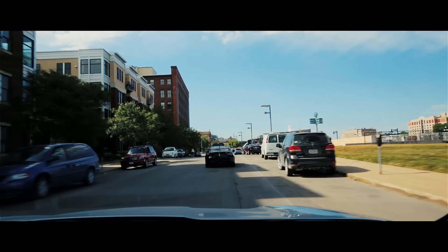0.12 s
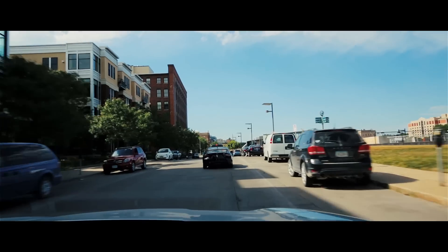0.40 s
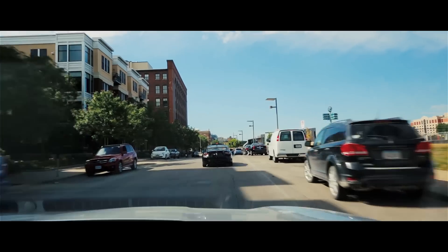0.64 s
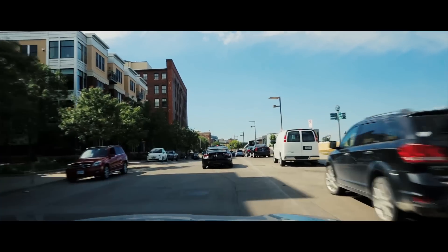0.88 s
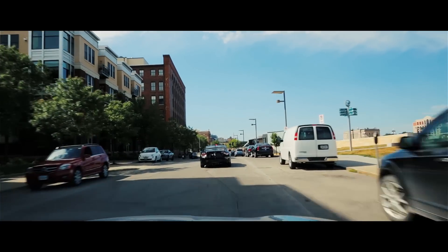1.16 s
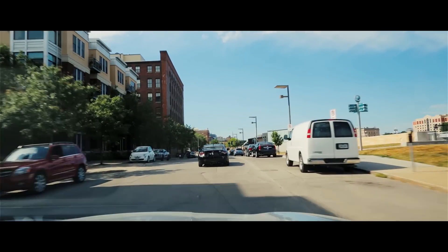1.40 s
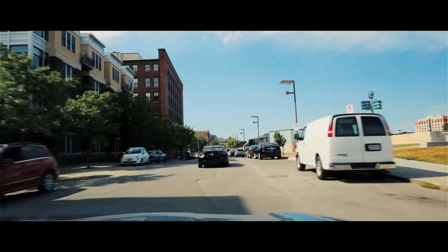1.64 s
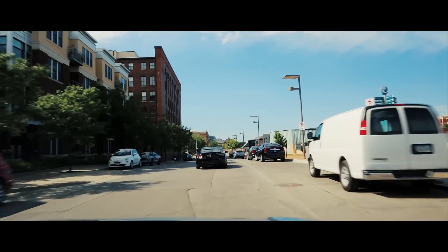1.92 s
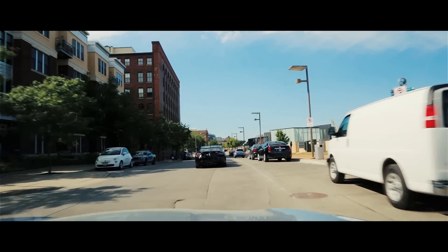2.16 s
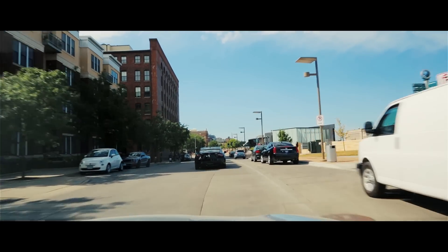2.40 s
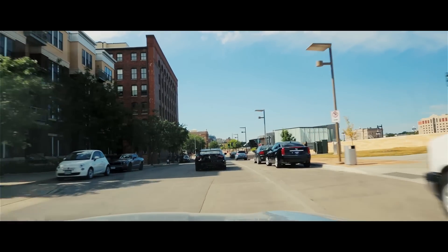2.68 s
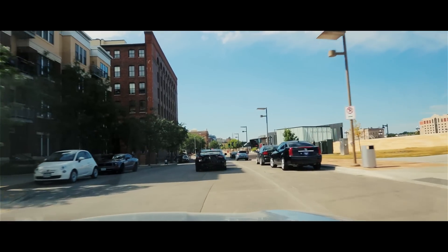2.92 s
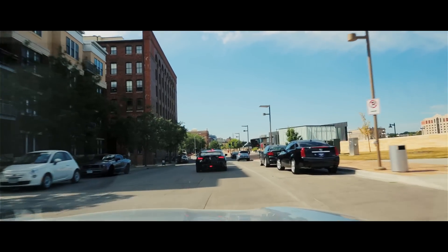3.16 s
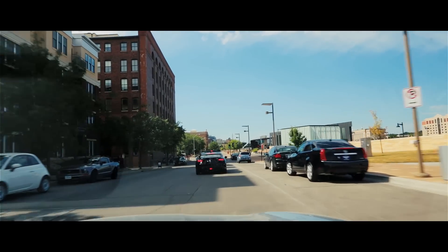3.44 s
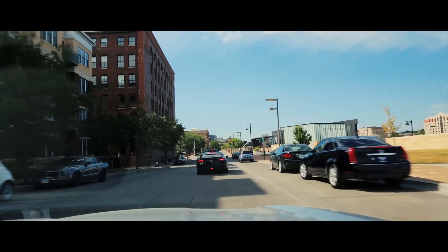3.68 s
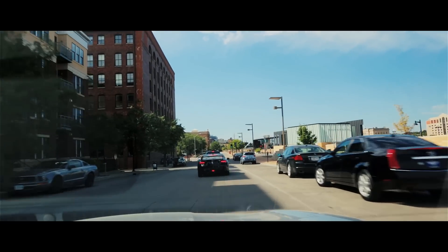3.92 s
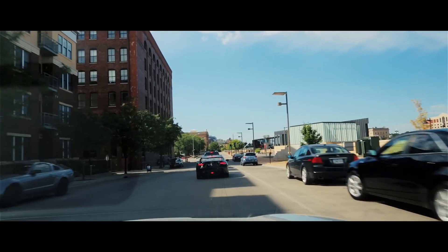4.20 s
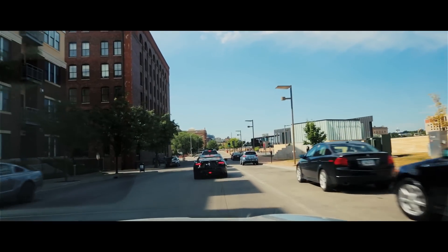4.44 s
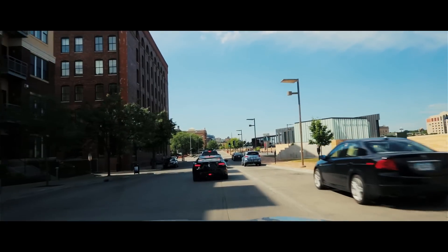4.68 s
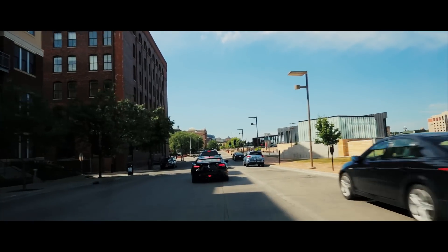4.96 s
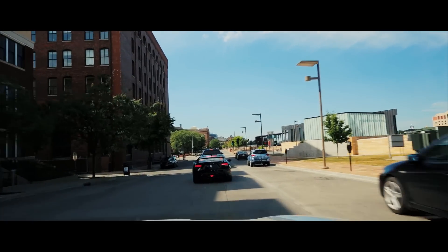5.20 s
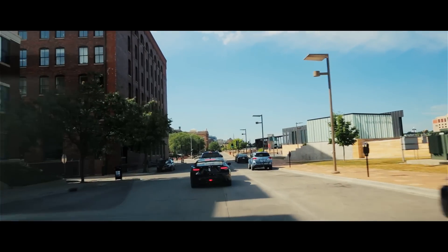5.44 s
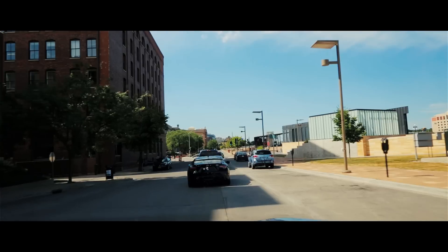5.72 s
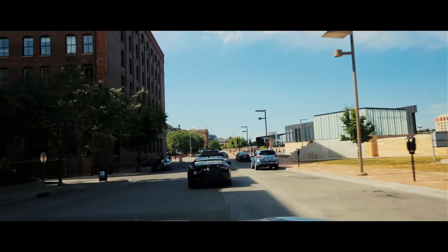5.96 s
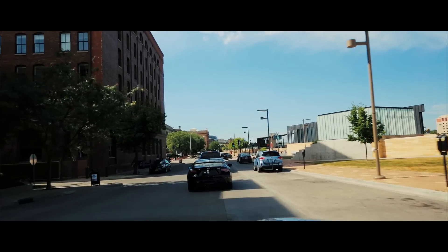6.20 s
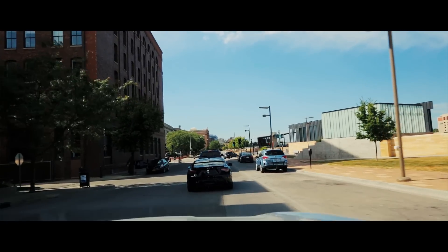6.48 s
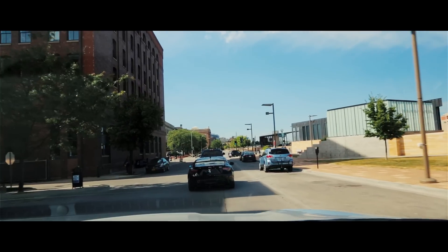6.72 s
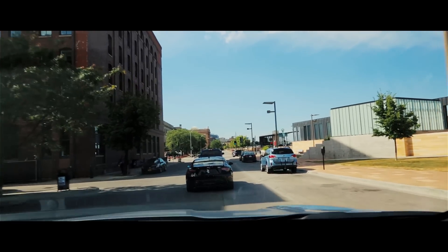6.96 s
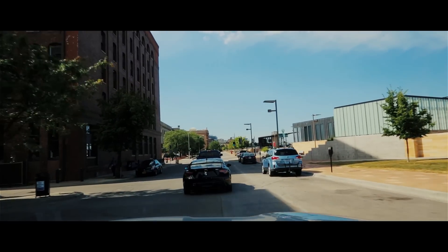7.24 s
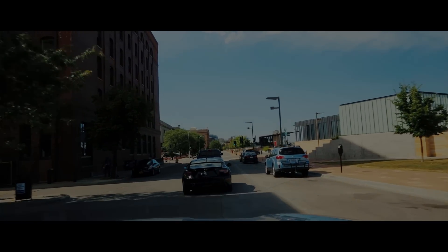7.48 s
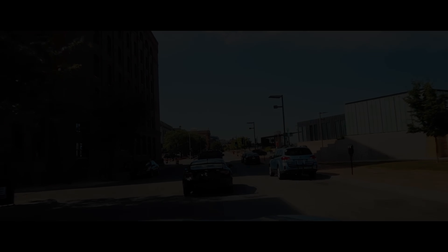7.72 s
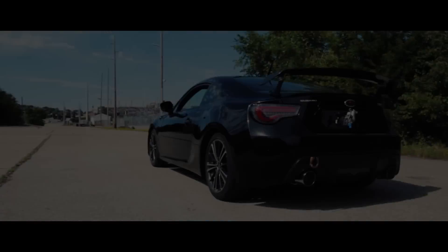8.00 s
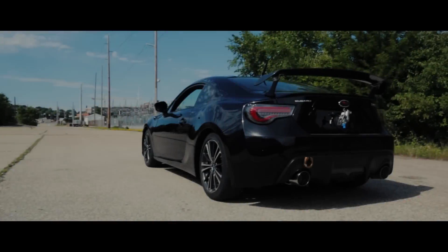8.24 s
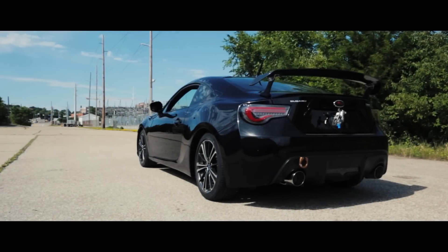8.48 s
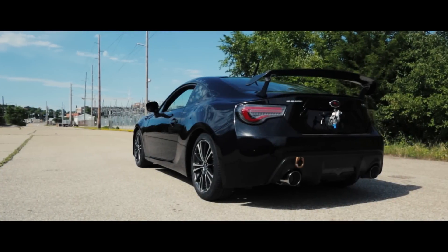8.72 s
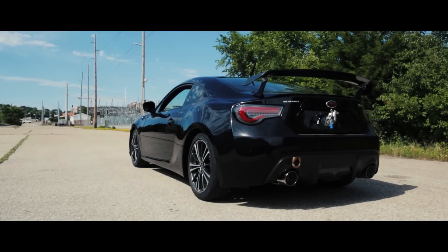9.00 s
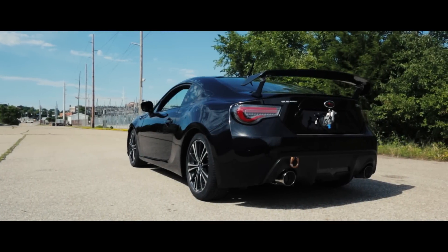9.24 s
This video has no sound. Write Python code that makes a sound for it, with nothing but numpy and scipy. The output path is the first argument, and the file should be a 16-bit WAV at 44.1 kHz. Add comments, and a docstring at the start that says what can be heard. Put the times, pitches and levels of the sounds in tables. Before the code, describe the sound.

Boomy, lumpy engine with a loud exhaust, heard in the cabin on a city street over bassy road noise. It climbs, pops on lift-off, swells again, then drones downward until barely idling; faint whine and ticks emerge. Then the microphone is outside near the standing car in an open lot: one small blip, a stronger barking rev, brief airy whistles as the throttle shuts, revs falling in a hollow hum.

```python
"""A four-cylinder sports car with a loud exhaust. First it is muffled and on the move over road noise: it
pulls, lifts off with pops in the pipe, blips, and coasts down to idle with a faint whine and two dry ticks.
A cross-fade then brings it standing in the open, revved twice, with whistles as the throttle shuts.
Unequal header pipes make the four firings arrive unevenly: summed sines give the boom on the low orders,
pulses ring the pipe resonances for the bark, and shaped pulses and noise give rasp and hiss above."""
import sys
import numpy as np
from scipy import signal
from scipy.fft import rfft, irfft, next_fast_len
from scipy.io import wavfile
from scipy.ndimage import uniform_filter1d

SR = 44100
rng = np.random.default_rng(int(sys.argv[2]) if len(sys.argv) > 2 else 0)


def materialize(psi):
    """Save the field psi as 16-bit PCM at rate SR to the path in sys.argv[1].

    A 1-D psi becomes a single channel; in a 2-D psi each row is a channel.
    """
    bounded = np.clip(np.atleast_2d(psi).T, -1, 1)
    quanta = np.round(bounded * 32767).astype(np.int16)
    wavfile.write(sys.argv[1], SR, quanta)


def boost(x):
    """Linear amplitude factor 10**(x/20) for a level x in decibels (scalar or array-like)."""
    u = np.asarray(x, float) / 20
    return 10 ** u


N = 413216


def rms_one(x):
    """The signal brought to rms 1 over its whole length."""
    return x / np.sqrt(np.mean(x ** 2) + 1e-20)


def columns(rows, t):
    """Every column after the first, interpolated at times t."""
    s, *rest = np.transpose(rows)
    return [np.interp(t, s, c) for c in rest]


def at_hz(points, hz):
    """Level of a spectrum's corner points, joined by lines over log frequency."""
    corner_hz, db = np.array(points).T
    return np.interp(np.log(hz), np.log(corner_hz), db)


def evened(x):
    """Running rms brought to 1 over 6000 samples (136 ms)."""
    return x / np.sqrt(uniform_filter1d(x ** 2, size=6000) + 1e-12)


def coloured(spectrum, x, smooth_hz=0):
    """The input shaped by a spectrum, corners rounded over smooth_hz; minimum phase, so nothing sounds early."""
    size = next_fast_len(len(x))
    hz = np.arange(1, size // 2 + 2) * SR / size
    shape_db = uniform_filter1d(at_hz(spectrum, hz), size=1 + int(smooth_hz * size / SR))
    # folding the cepstrum onto positive time makes the phase minimum
    cepstrum = irfft(shape_db * np.log(10) / 20, size)
    cepstrum[1:size // 2] *= 2
    cepstrum[size // 2 + 1:] = 0
    return irfft(rfft(x, size) * np.exp(rfft(cepstrum)), size)[:len(x)]


def resonance(x, hz, width_hz):
    """Two-pole band-pass, gain 1 on top."""
    r = np.exp(-np.pi * width_hz / SR)
    numerator = np.array([1, 0, -1]) * (1 - r * r) / 2
    return signal.lfilter(numerator, [1, -2 * r * np.cos(2 * np.pi * hz / SR), r * r], x)


# the burn stumbles and the half order swells: start t/s, length/s, level/dB
STUMBLE_SWELLS = [(0.484, 0.21, -26), (0.873, .1, -47.5), (1.064, 0.036, -18), (2.501, 0.36, -29),
                  (7.52, .08, -46), (8.4, 0.13, -43)]


def half_order(t, first_db):
    """Level of the half order in dB: faint under the firing tone, swelling in each stumble."""
    edge_s, under_firing_tone_db = 0.024, -39
    swell = 0
    for s, length, db in STUMBLE_SWELLS:
        inside = np.minimum(t - s, s + length - t)
        swell = swell + boost(db) * np.clip(inside / edge_s + 1, 0, 1)
    return 20 * np.log10(boost(first_db + under_firing_tone_db) + swell)


# the four cylinders in firing order, before unevenness and imbalance scale them: lag/ms, strength/dB
CYLINDER_PATTERN = [(.54, 1.8), (-.54, -.2), (-.18, -1.4), (.18, 0)]
# as the revs sink from the first rate to the second the pattern shifts: firing rates/(1/s)
PATTERN_SHIFT_RATES = (140, 105)
# full shift of each cylinder, before imbalance scales it: level/dB
PATTERN_SHIFT = [-.8, 2, -.2, -.6]


def strengths(rate, imbalance, shifts, bias_db):
    """Strength of each cylinder over time in dB; a negative imbalance reverses the pattern."""
    high_rate, low_rate = PATTERN_SHIFT_RATES
    sunk = shifts * np.clip((high_rate - rate) / (high_rate - low_rate), 0, 1)
    own_db = np.array(CYLINDER_PATTERN)[:, 1:] + np.reshape(bias_db, (-1, 1))
    return (own_db + np.array(PATTERN_SHIFT)[:, None] * sunk) * imbalance


def waver(shape, rate):
    """Slow complex noise from two equal low-pass poles, one row per order; overall rms 1."""
    blur_hz = 20
    r = np.exp(-2 * np.pi * blur_hz / rate)
    noise = rng.standard_normal(shape) + 1j * rng.standard_normal(shape)
    slow = signal.lfilter([1], [1, -2 * r, r * r], noise)
    return slow / np.sqrt(np.mean(abs(slow) ** 2))


def boom_lead(rate):
    """Firing intervals by which the firing tone leads the pulses, most near the pipe's deepest resonance."""
    return .02 + .13 * np.exp(-((rate - 100) / 32) ** 2)


# orders of the firing rate whose levels are set one by one: order
SET_ORDERS = [1, 1 / 2, 3 / 4, 2, 4, 5 / 4, 3 / 2, 7 / 4, 5 / 2, 3, 9 / 4]
# relative response of the exhaust's low end: f/Hz, level/dB
PIPE_RESPONSE = [(20, -49.5), (50, -13.5), (95, 16), (120, 2), (150, -8.5), (190, 5), (235, -14),
                 (290, -10), (340, -16), (400, -25.5), (750, -47.5)]


def boom(turns, rate, uneven, strength_db, heard_db, others_db, blur, polarity):
    """Sines on every quarter order up to the eleventh; the cylinder pattern sets their phase and balance."""
    step = slice(0, None, 64)   # the orders' levels and phases move slowly
    tilt_db = -2.5   # per doubling of the order: a pulse is broad
    lag_s, strength = np.array(CYLINDER_PATTERN)[:, :1] / 1000, boost(strength_db[:, step])
    order = np.arange(1, 45)[:, None] / 4
    order_hz = order * rate[step]
    # the slow body of each pulse lags more than its steep front
    arrival = np.arange(4)[:, None] + 2.2 * lag_s * uneven[step] * rate[step]
    wave = sum(a * np.exp(-2j * np.pi * order * d) for a, d in zip(strength, arrival))
    wave = wave * boost(at_hz(PIPE_RESPONSE, order_hz) + tilt_db * np.log2(order))
    upper = np.exp(-((order_hz - 285) / 80) ** 2)   # the part of the stack that sets the others' level
    wave *= boost(others_db[step]) / np.sqrt(np.sum(upper * abs(wave) ** 2, axis=0))
    for k, db in zip(SET_ORDERS, heard_db):
        row = round(4 * k) - 1
        wave[row] *= boost(db[step]) / (abs(wave[row]) + 1e-12)
    wave[[1, 5]] *= -1   # the half and 3/2 orders leave the pipe inverted
    wave[7] *= polarity   # second order
    # orders from 9/4 up waver
    wavering = 1 + blur[step] * waver(wave[8:].shape, SR / 64)
    wave[8:] *= wavering / np.sqrt(1 + blur[step] ** 2)
    wave[3] *= np.exp(2j * np.pi * boom_lead(rate[step]))   # the firing tone
    fine, coarse = np.arange(len(turns)), np.arange(len(turns))[step]
    # each power of the engine cycle is the next quarter order
    cycle, power, out = np.exp(2j * np.pi * turns / 4), 1, 0
    for w in wave:
        power = power * cycle
        out = out + (np.interp(fine, coarse, w) * power).real
    return np.sqrt(2) * out


# single firings that come harder or weaker than their turn: t/s, level/dB
UNUSUAL_FIRINGS = [(.163, 1.5), (.244, 2.5), (.638, 5), (.78, 1.5), (.923, 2.5), (1.012, 2.5), (1.648, 2),
                   (1.657, 4), (1.696, 3), (1.735, 2), (1.765, 2), (1.774, 2.5), (1.804, 2), (1.813, 0.5),
                   (1.92, 2), (1.959, 1), (2.422, 4), (2.765, 4), (7.938, -1.5), (7.962, 8), (7.975, -5),
                   (7.987, 8.5), (8, -4), (8.012, 1.5), (8.025, -17), (8.047, -2.5), (8.09, -2.5),
                   (8.129, 1), (8.139, 3), (8.165, 2.5), (8.175, 3), (8.2, 2), (8.225, 3), (8.263, 2),
                   (8.293, -.5), (8.321, 0)]


def firings(t, turns, uneven, strength_db, scatter_db, steepen, lead_ms):
    """One pulse per firing, uneven in time and strength; returns due samples, scatter/dB, blows and fronts."""
    number = np.arange(np.ceil(turns[0]), turns[-1])
    due = np.interp(number, turns, np.arange(len(t))).astype(int)
    cylinder = number.astype(int) % 4
    lag_ms = np.array(CYLINDER_PATTERN)[cylinder, 0]
    luck = rng.standard_normal((len(number), 2)) * scatter_db[due, None]
    firing_db = strength_db[cylinder, due] + luck[:, 0]
    for s, db in UNUSUAL_FIRINGS:
        if t[0] < s < t[-1]:
            firing_db[np.argmin(abs(t[due] - lead_ms / 1000 - s))] += db
    # an unsteady burn also comes a little early or late
    at = due + (lag_ms * uneven[due] - lead_ms + 0.025 * luck[:, 1]) * SR / 1000
    at = np.clip(np.round(at).astype(int), 0, len(t) - 1)
    blows, fronts = np.zeros(len(t)), np.zeros(len(t))
    blows[at] = boost(firing_db)
    fronts[at] = boost(steepen * firing_db)   # strong pulses steepen and carry more treble
    return due, luck[:, 0], blows, fronts


def bark(blows, rate, share, stir_db, bark_modes, loaded_modes, shut_modes, low_hz, top_hz):
    """Pipe resonances rung by the pulses and, with the throttle shut, stirred by flow noise as well."""
    # at low revs flow noise takes over from the pulses: 14 dB per octave under 90 firings per s
    octaves_sunk = np.clip(np.log2(90 / rate), 0, 1)
    flow = boost(stir_db + 14 * octaves_sunk) * (1 - share) ** 2 * rng.standard_normal(len(rate))
    stirred = evened(blows) + flow
    main = sum(boost(db) * resonance(stirred, hz, width) for hz, width, db in bark_modes)
    main = signal.sosfiltfilt(signal.butter(2, low_hz, "high", fs=SR, output="sos"), main)
    main = signal.sosfiltfilt(signal.butter(6, top_hz, fs=SR, output="sos"), main)

    def narrow(modes):
        """Each mode is two equal resonances in a row, held at a steady level."""
        return sum(boost(db) * evened(resonance(resonance(stirred, hz, width), hz, width))
                   for hz, width, db in modes)

    return evened(main) + share * narrow(loaded_modes) + (1 - share) * narrow(shut_modes)


def rasp(fronts, colour, puff_ms, crack_db, smooth_hz):
    """The crack of each steep front and the decaying turbulent puff behind it."""
    puff_envelope = signal.lfilter([1], [1, -np.exp(-1000 / (puff_ms * SR))], fronts)
    puffs = puff_envelope * rng.standard_normal(len(fronts))
    source = boost(crack_db) * rms_one(fronts) + rms_one(puffs)
    return evened(coloured(colour, source, smooth_hz=smooth_hz))


def hiss(length, colour):
    """Steady coloured noise: the part of the treble that does not follow the firings."""
    return rms_one(coloured(colour, rng.standard_normal(length)))


def engine(speed, levels, sides, burn, stir, bark_modes, loaded_modes, shut_modes, hiss_colour, rasp_colour,
           start_turn, steepen, puff_ms, crack_db, stack_db, shifts, lead_ms, polarity, low_hz, top_hz,
           smooth_hz, bias_db):
    """One firing after another: boom, bark and rasp share the same timing and scatter."""
    first, last = max(int(speed[0][0] * SR), 0), min(int(burn[-1][0] * SR), N)
    t = np.arange(first, last) / SR
    rate, = columns(speed, t)
    first_db, second_db, lope_db, bark_db, treble_db = columns(levels, t)
    # the fourth order lies 7 dB under the second, before the pipe
    pipe_gap_db = at_hz(PIPE_RESPONSE, rate * 4) - at_hz(PIPE_RESPONSE, 2 * rate)
    fourth_db = second_db - 7 + pipe_gap_db
    side_db = columns(sides, t)
    nine_quarter_db = side_db[0] - 10   # under the 5/4 order
    heard_db = [first_db, half_order(t, first_db), lope_db, second_db, fourth_db, *side_db, nine_quarter_db]
    others_db = stack_db + 0.67 * bark_db   # the rest of the stack follows a share of the bark's swing
    uneven, imbalance, scatter_db, rasp_share = columns(burn, t)
    share = np.clip(rasp_share, 0, 1)
    stir_db, blur = columns(stir, t)

    turns = start_turn + np.cumsum(rate) / SR - boom_lead(rate)   # counted in firings
    strength_db = strengths(rate, imbalance, shifts, bias_db)
    due, luck_db, blows, fronts = firings(t, turns, uneven, strength_db, scatter_db, steepen, lead_ms)
    low = boom(turns, rate, uneven, strength_db, heard_db, others_db, blur * (1 - share), polarity)
    low = low * boost(0.5 * np.interp(np.arange(len(t)), due, luck_db))   # half the scatter reaches the boom
    middle = bark(blows, rate, share, stir_db, bark_modes, loaded_modes, shut_modes, low_hz, top_hz)
    crackle = np.sqrt(share) * rasp(fronts, rasp_colour, puff_ms, crack_db, smooth_hz)
    treble = crackle + np.sqrt(1 - share) * hiss(len(t), hiss_colour)
    out = np.zeros(N)
    out[first:last] = low + polarity * boost(bark_db) * middle + boost(treble_db) * treble
    return out


# engine speed on the move: t/s, firing rate/(1/s)
MOVING_SPEED = [(0, 141.51), (.42, 156.77), (.5, 158.19), (1.11, 127.09), (1.38, 101.82), (1.5, 98.12),
                (1.8, 102.67), (2.43, 109.21), (2.68, 105.43), (2.83, 106.24), (3.96, 97.95), (4.64, 89.09),
                (4.8, 85.23), (5.78, 44.58), (6.12, 29.33), (6.28, 26.96), (6.86, 31.79), (7.36, 31.19)]
# layers: t/s, then level/dB of firing tone, second order, 3/4 order lope, bark, treble
MOVING_LEVELS = [(0, -15.5, -23.5, -25, -16, -25.5), (.38, -16, -25, -24, -17, -28),
                 (0.452, -19, -29.5, -30, -19, -34.5), (.5, -25, -34.5, -19, -32, -50),
                 (.65, -17, -34.5, -33.5, -33.5, -50.5), (.85, -14.5, -30, -20.5, -29, -51.5),
                 (1.1, -18.5, -30.5, -21.5, -35, -54), (1.299, -19, -44.5, -41, -42.5, -55.5),
                 (1.501, -17, -23.5, -55, -33.5, -55.5), (1.62, -12.5, -19.5, -49.5, -26, -49),
                 (1.78, -12, -18, -52, -22, -41), (2.201, -14.5, -24, -37, -24.5, -48),
                 (2.45, -24, -44, -48, -36.5, -54.5), (2.6, -14.5, -35, -29, -44, -55),
                 (2.9, -11.5, -35.5, -32, -39.5, -53.5), (4.502, -10, -29, -41.5, -43, -54),
                 (4.999, -17.5, -31.5, -49, -50, -59.5), (5.6, -24, -22.5, -56.5, -55, -61.5),
                 (5.95, -40, -26, -69.5, -65, -65.5), (6.121, -67, -28, -70, -67, -69),
                 (6.22, -66.5, -50, -73.5, -99.5, -71), (6.7, -53, -36, -82, -68, -76.5),
                 (7.36, -49, -38, -84, -68, -72)]
# neighbours of the firing tone: t/s, then level/dB of the 5/4, 3/2, 7/4, 5/2 and third orders
MOVING_SIDES = [(0, -28, -36, -32.5, -42, -56), (.4, -28, -30.5, -33.5, -39.5, -41),
                (.55, -32.5, -35.5, -40.5, -53, -54), (.66, -20.5, -35.5, -38.5, -55.5, -62),
                (.83, -30, -25, -37, -40.5, -45), (1.05, -26.5, -31, -50.5, -44, -48.5),
                (1.27, -48.5, -40, -30, -42.5, -41), (1.48, -29.5, -35, -23, -41, -33),
                (1.75, -31, -31.5, -26, -28.5, -27.5), (2.15, -36.5, -32.5, -19.5, -39.5, -27.5),
                (2.45, -40, -40, -26, -50.5, -41.5), (3.1, -34, -33.5, -27, -39.5, -48.5),
                (3.95, -32, -38.5, -27.5, -41, -65), (4.6, -31, -36, -29, -35.5, -47),
                (5.3, -39.5, -41, -31.5, -30.5, -37), (5.9, -53, -48.5, -45, -50, -29.5),
                (6.25, -59, -53, -53.5, -53, -43.5), (6.8, -63.5, -47, -56, -54.5, -29),
                (7.36, -65, -56, -56.5, -57, -32.5)]
# combustion: t/s, unevenness of arrival [0-1], factor on the cylinders' strength gaps (negative reverses),
# firing-to-firing scatter level/dB, rasp share of the treble [0-1]
MOVING_BURN = [(0, 0.32, 1.3, 0.44, 0.98), (0.449, 0.31, 1.5, 0.49, 0.98), (0.519, 1, -3.5, 2, 0.12),
               (.8, 0.23, -12, 1.9, 0.16), (1.1, 0.88, -23, 6.4, 0.1), (1.22, 0.7, 4.5, 0.49, 0.037),
               (1.499, 1, 1.5, 1, 0.032), (1.62, .86, 0.3, 0.84, .3), (1.72, .9, 3, 0.47, 0.86),
               (1.86, .9, 1.76, .5, 0.83), (2.05, .9, 1.5, .5, 0.74), (2.302, 0.89, 2, 0.083, 0.51),
               (2.548, 0.82, -6.5, 3.2, 0.075), (2.949, 0.93, -12, 0.46, 0.024),
               (4.802, 0.94, 0.5, 0.1, 0.0093), (5.501, 0.98, 1.5, 0.99, 0.027),
               (6.099, 0.83, -7, 3, 0.028), (6.401, 0.31, 1, 0.16, 0.18), (7.75, 0.56, 3, 0.18, 0.05)]
# throttle shut: t/s, flow noise over the pulses before low revs raise it level/dB, wavering [0-1.5]
MOVING_STIR = [(0, -4, .3), (.55, -4, .3), (.7, -8, .3), (1.1, -6, .3), (1.3, 1, .3), (1.62, -2, .3),
               (2.3, -4, .3), (2.45, 4, .3), (2.75, 2, .3), (3, -4, .2), (4.5, -3, .2), (4.9, 0, 1.1),
               (5.7, 0, 1.3), (6.2, -3, .4), (7.75, -3, .3)]
# bark resonances: f/Hz, width/Hz, relative level/dB
MOVING_BARK = [(426, 23, -15), (589, 149, 11.5), (780, 95, 3.5), (856, 30, 2)]
# further bark resonances that come in as the rasp share rises under load: f/Hz, width/Hz,
# level/dB against the bark
MOVING_LOADED = [(859.5, 110, -8.5), (732, 75, -8)]
# resonances that show with the throttle shut: f/Hz, width/Hz, level/dB against the bark
MOVING_SHUT = [(422, 81, -7.5), (505.5, 110, -5.5), (873, 17, -19.5)]
# treble colour of the hiss: f/Hz, relative level/dB
MOVING_HISS = [(590, -30.5), (1000, 1.5), (1400, 3), (1690, -4), (2670, -8.5), (3500, -9.5), (4620, -21.5),
               (6270, -23), (8000, -36.5), (10400, -66), (17600, -120)]
# treble colour of the rasp: f/Hz, relative level/dB
MOVING_RASP = [(590, -18.5), (1000, -7), (1120, -5), (1270, 3), (1450, 6.5), (1620, -5), (1850, -24),
               (2070, -7.5), (2170, -6.5), (2430, -23.5), (2680, -15), (3390, -29), (3820, -19),
               (4310, -38), (6000, -51), (7020, -65.5), (8000, -61.5), (10400, -91), (17600, -120)]


def driving_engine():
    """The muffled engine on the move: upright polarity, the strength pattern shifting as the revs sink."""
    return engine(MOVING_SPEED, MOVING_LEVELS, MOVING_SIDES, MOVING_BURN, MOVING_STIR,
                  MOVING_BARK, MOVING_LOADED, MOVING_SHUT, MOVING_HISS, MOVING_RASP,
                  start_turn=.405,   # place in the four-firing cycle
                  steepen=1.9, puff_ms=2.5, crack_db=19, stack_db=-5.5, shifts=1, lead_ms=.6, polarity=1,
                  low_hz=443, top_hz=868.0, smooth_hz=90, bias_db=-1)


# colour of the road noise: f/Hz, relative level/dB per Hz
ROAD_COLOUR = [(25, -37), (60, 5.5), (180, -6.5), (330, -24), (600, -37), (1100, -50), (4000, -52.5),
               (5500, -59), (7500, -85)]


def road():
    """Steady noise of the rolling car, strongest in the bass."""
    return boost(-39.5) * rms_one(coloured(ROAD_COLOUR, rng.standard_normal(N)))


# unburnt fuel going off in the pipe: t/s, relative level/dB
FUEL_POPS = [(0.498, -7.5), (0.918, -15), (1.059, -8.5), (1.068, -10), (1.073, -11.5), (1.084, -13),
             (1.105, -19)]
# resonances each pop strikes: f/Hz, relative level/dB, t60/s
PIPE_POP_MODES = [(70.4, -21, 0.17), (104, -12, 0.23), (167, 1, 0.022), (600, -21, .025), (900, -16, .035),
                  (1450, -28, .035)]


def pops():
    """Each pop is a blow on decaying pipe modes, softened by a low-pass."""
    out = np.zeros(N)
    at = [round(s * SR) for s, _ in FUEL_POPS]
    for hz, db, t60 in PIPE_POP_MODES:
        blows = np.zeros(N) + 1e-18
        blows[at] = boost(np.array(FUEL_POPS)[:, 1] + db - 0.5)
        r, w = boost(-60 / (t60 * SR)), 2 * np.pi * hz / SR
        out += signal.lfilter([0, np.sin(w)], [1, -2 * r * np.cos(w), r * r], blows)
    return signal.sosfilt(signal.butter(6, 1600, fs=SR, output="sos"), out)


def whine():
    """A faint thin whine of narrow noise, rising near idle and pulsing with every second firing."""
    t = np.arange(N) / SR
    turns = np.cumsum(columns(MOVING_SPEED, t)[0]) / SR
    pulsing = uniform_filter1d((np.cos(np.pi * turns) > -.3) * 1., size=300)
    tone = rms_one(resonance(resonance(rng.standard_normal(N), 5270, 40), 5270, 40))
    return boost(np.interp(t, [5.6, 6.3], [-108, -89])) * tone * pulsing


# faint dry ticks in the cabin, before their resonance: t/s, level/dB
CABIN_TICKS = [(7.137, -53), (7.279, -58)]


def ticks():
    """Short soft noise bursts, twice through one broad resonance."""
    hz, width_hz, length_ms = 2300, 1100, 12
    t = np.arange(N) / SR
    shape = sum(boost(db) * np.exp(-((t - s) * 1000 / length_ms - 1) ** 2) for s, db in CABIN_TICKS)
    bursts = shape * rng.standard_normal(N) + 1e-18
    return resonance(resonance(bursts, hz, width_hz), hz, width_hz)


# engine speed standing in the open: t/s, firing rate/(1/s)
OPEN_SPEED = [(7.38, 57.71), (7.52, 59.6), (7.72, 81.84), (7.78, 84.79), (7.92, 74.9), (7.98, 78.53),
              (8.06, 89.16), (8.34, 146.78), (8.4, 150.17), (8.66, 133.99), (9.37, 99.82)]
# layers: t/s, then level/dB of firing tone, second order, 3/4 order lope, bark, treble
OPEN_LEVELS = [(7.38, -52, -41, -60, -62, -68), (7.501, -29, -28.5, -58, -42, -53),
               (7.599, -26.5, -25, -38, -27.5, -48), (7.74, -27.5, -36, -49, -31.5, -49.5),
               (7.86, -23.5, -55, -31, -45.5, -46), (7.919, -22.5, -21.5, -43, -29.5, -43.5),
               (7.957, -17.5, -26, -48, -17.5, -40), (8.058, -19, -28.5, -49, -20, -39.5),
               (8.11, -16, -26, -50, -17.5, -35), (8.179, -17.5, -30, -54, -19, -31.5),
               (8.259, -22, -40, -30.5, -17.5, -25), (8.325, -22.5, -30, -39, -21, -24),
               (8.362, -33.5, -59, -26, -22, -38), (8.46, -21.5, -31.5, -29, -26, -37.5),
               (8.85, -17, -43, -30.5, -28, -38.5), (9.1, -12.5, -36, -36, -31, -37.5),
               (9.37, -13.5, -34, -64, -33.5, -40)]
# neighbours of the firing tone: t/s, then level/dB of the 5/4, 3/2, 7/4, 5/2 and third orders
OPEN_SIDES = [(7.38, -52, -58, -60, -60, -49), (7.6, -38, -36, -29.5, -66, -30.5),
              (7.86, -32, -36, -37.5, -33.5, -57), (7.98, -29, -27.5, -35, -33, -24.5),
              (8.1, -39, -37, -47, -42, -25.5), (8.25, -46, -42, -47, -50, -42),
              (8.37, -39, -43, -38, -61, -27), (8.52, -38, -38, -47, -38, -41),
              (8.78, -32.5, -35, -36, -41, -44), (9.1, -36, -30.5, -27, -37.5, -70),
              (9.37, -34, -31.5, -33, -41, -60)]
# combustion: t/s, unevenness of arrival [0-1], factor on the cylinders' strength gaps (negative reverses),
# firing-to-firing scatter level/dB, rasp share of the treble [0-1]
OPEN_BURN = [(7.38, 1, 0, 0.79, 0.55), (7.619, 0.069, -2.8, 4.9, 0.07), (7.848, 0.98, 0, 4.1, 0.0087),
             (7.93, 0.3, 2.5, 3, 0.11), (8.03, 0.24, 7, 1.1, 0.38), (8.122, 0.13, 1.5, 0.92, 0.85),
             (8.3, 0.35, 3.5, 0.55, 0.98), (8.36, 0.76, 1, .6, 0.84), (8.459, 0.99, 2, 1.3, 0.12),
             (8.5, 1, -3, 0.5, 0.043), (9.37, 0.46, -1, 0.11, 0.071)]
# throttle shut: t/s, flow noise over the pulses before low revs raise it level/dB, wavering [0-1.5]
OPEN_STIR = [(7.38, -5, .45), (9.37, -5, .45)]
# bark resonances: f/Hz, width/Hz, relative level/dB
OPEN_BARK = [(443, 190, 9.5), (537, 38, -5.5), (590.6, 88, 6.5)]
# further bark resonances that come in as the rasp share rises under load: f/Hz, width/Hz,
# level/dB against the bark
OPEN_LOADED = [(828, 83, -11), (1111, 58, -17)]
# resonances that show with the throttle shut: f/Hz, width/Hz, level/dB against the bark
OPEN_SHUT = [(765, 157, -17.5)]
# treble colour of the hiss: f/Hz, relative level/dB
OPEN_HISS = [(590, -40), (820, -4), (1000, -7), (1170, 0), (1320, -8), (1920, -7), (2560, -12.5),
             (3150, -12.5), (3780, -18), (4600, -20.5), (6260, -18), (8740, -24.5), (13700, -27.5),
             (15500, -43)]
# treble colour of the rasp: f/Hz, relative level/dB
OPEN_RASP = [(590, -58), (720, -4), (850, 2.5), (1000, -8), (1160, -2), (1400, -25.5), (1600, -13.5),
             (1950, -9), (2130, -18), (2380, -2), (2750, -22.5), (3150, -13.5), (3700, -35.5), (4600, -21),
             (5850, -36.5), (10100, -34.5), (15500, -44.5)]
# added to each cylinder before imbalance scales it: level/dB
OPEN_BIAS = [0.85, 0.74, 0.087, 0.61]


def standing_engine():
    """The engine revved in the open: bark and second order inverted, pulses further ahead of the boom."""
    return engine(OPEN_SPEED, OPEN_LEVELS, OPEN_SIDES, OPEN_BURN, OPEN_STIR,
                  OPEN_BARK, OPEN_LOADED, OPEN_SHUT, OPEN_HISS, OPEN_RASP,
                  start_turn=3.2,   # place in the four-firing cycle
                  steepen=1.5, puff_ms=3, crack_db=9, stack_db=-13.5, shifts=0, lead_ms=3.5, polarity=-1,
                  low_hz=292, top_hz=609, smooth_hz=260, bias_db=OPEN_BIAS)


# a breathy whistle as the throttle shuts: start t/s, length/s, from f/Hz, to f/Hz, level/dB
THROTTLE_WHISTLES = [(8.351, 0.11, 930, 1011, -32.5), (8.418, 0.14, 1330, 1322, -43)]


def whistles():
    """Gliding tones that swell and fade, roughened by slow noise on their level."""
    t, out = np.arange(N) / SR, 0
    for s, length, from_hz, to_hz, db in THROTTLE_WHISTLES:
        way = np.clip((t - s) / length, 0, 1)
        rough = 1 + .5 * rms_one(uniform_filter1d(rng.standard_normal(N), size=500))
        tone = np.sin(2 * np.pi * np.cumsum(from_hz + (to_hz - from_hz) * way) / SR)
        out = out + boost(db) * np.sin(np.pi * way) * rough * tone
    return out


# start and end of the cross-fade: t/s
CROSSFADE = (7.38, 7.72)


def scene():
    """The moving car fades out while the standing car comes in."""
    fade = np.interp(np.arange(N) / SR, CROSSFADE, [0, 1])
    driving = driving_engine() + road() + pops() + whine() + ticks()
    standing = standing_engine() + whistles()
    fade_in = np.minimum(6.3 * fade, 1)   # the standing car is in this many times sooner
    return (driving * (1 - fade) + standing * fade_in)[None]


def low_pass(x):
    """Removes everything above the highest recorded frequency."""
    return signal.sosfilt(signal.butter(12, 15680, fs=SR, output="sos"), x)


def record(dry):
    """The microphone drops the deepest bass, then peaks are rounded."""
    high_pass = signal.butter(3, 36, "high", fs=SR, output="sos")
    bass_cut = signal.sosfiltfilt(high_pass, dry, padtype="even", padlen=SR // 10)
    rounded = 1.15 * np.tanh(bass_cut / 1.15)
    return low_pass(rounded)


dry = scene()
out = record(dry)
materialize(out)
```